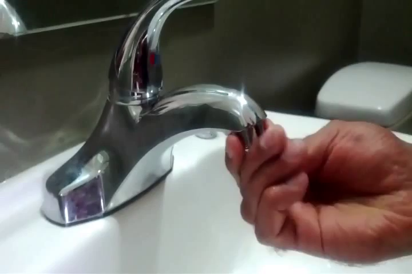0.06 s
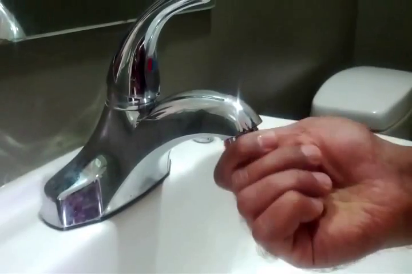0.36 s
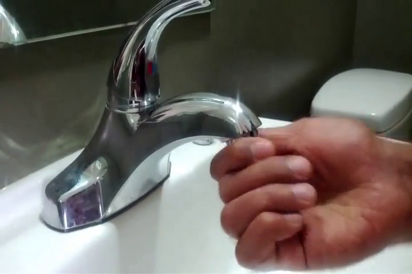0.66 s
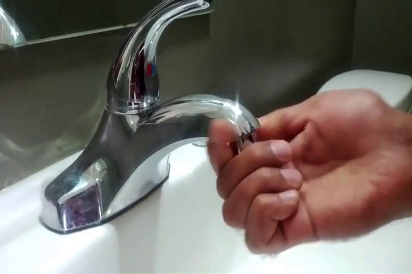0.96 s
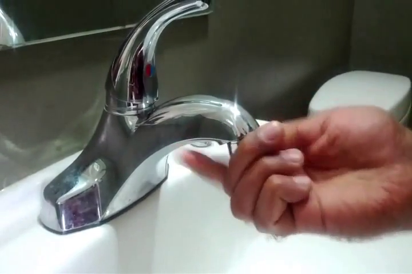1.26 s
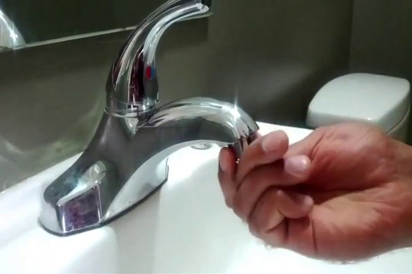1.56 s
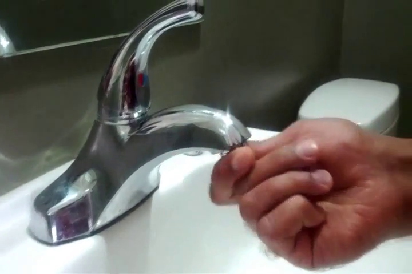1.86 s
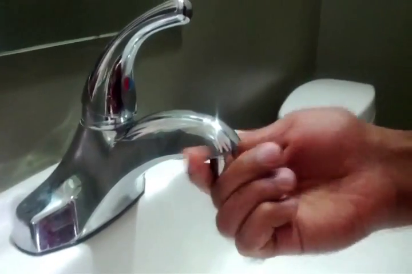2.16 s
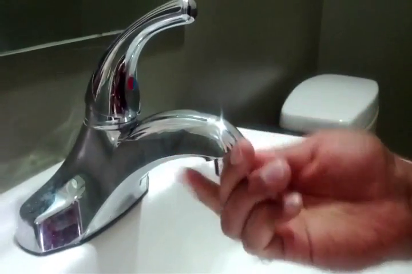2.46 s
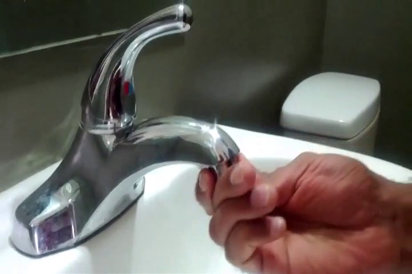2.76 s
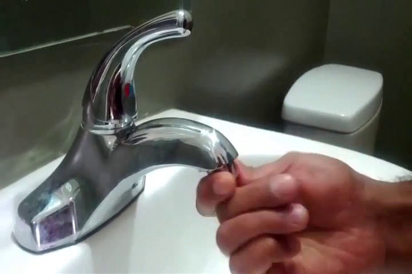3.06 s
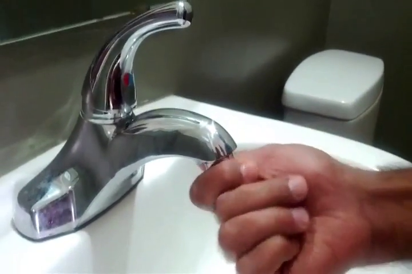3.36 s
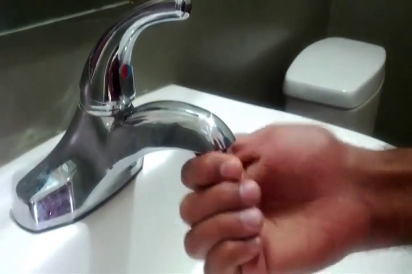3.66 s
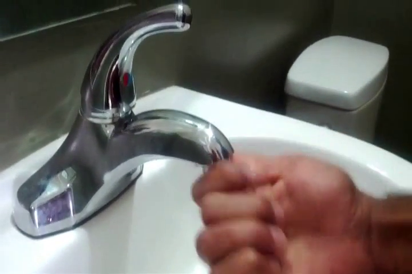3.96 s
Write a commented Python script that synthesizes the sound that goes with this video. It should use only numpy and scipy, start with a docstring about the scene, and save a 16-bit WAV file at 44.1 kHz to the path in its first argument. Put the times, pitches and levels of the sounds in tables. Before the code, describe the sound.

Close, uneven clicks and brief scrapes come from the threads of a faucet tip being unscrewed, with soft finger brushes between turns. Near the end comes one bright snap and a lighter knock, over a faint hum in a small bathroom.

```python
"""Gritty scrapes and clicks, over a faint hum, as a hand twists the aerator on a bathroom faucet.
The threads of this small fitting catch and slip, and each slip rings the spout and basin.
Fingers pop off the fitting and brush the chrome between turns. Near the end it jumps free
with a sharp snap, rubs faintly and knocks once. It is all close by, in a small hard room."""
import sys
import numpy as np
from scipy import signal
from scipy.fft import rfft, irfft, next_fast_len
from scipy.io import wavfile

SR = 44100
rng = np.random.default_rng(int(sys.argv[2]) if len(sys.argv) > 2 else 0)


def wav_out(sig):
    """Save sig, one row per channel (or a flat mono array), as 16-bit PCM at SR to the path in sys.argv[1]."""
    wavfile.write(sys.argv[1], SR, np.round(np.clip(np.atleast_2d(sig).T, -1, 1) * 32767).astype(np.int16))


N = 176400
CLOCK = np.arange(N) / SR  # seconds through the whole scene
SIZE = 32768  # samples in one short sound
T = np.arange(SIZE) / SR
HZ = np.fft.rfftfreq(SIZE, 1 / SR)
LEAD_S = .02  # time left before a slip for its creak


def amp(db):
    """Turn decibels into a gain."""
    return 10 ** (np.asarray(db) / 20)


def along(points, hz):
    """Read a curve of (pitch_hz, value) points on a log pitch scale."""
    pitches, values = np.transpose(points)
    return np.interp(np.log(hz + 1), np.log(pitches + 1), values)


def normed(x):
    """Scale to an energy of one."""
    return x / np.sqrt(np.sum(x ** 2) + 1e-20)


def add(track, start_s, sound):
    """Mix a sound into the track."""
    part = track[max(0, round(start_s * SR)):][:len(sound)]
    part += sound[:len(part)]


def causal(db):
    """A filter with these gains that never rings before it is struck (minimum phase)."""
    cepstrum = irfft(np.log(amp(db)))
    cepstrum[1:SIZE // 2] *= 2
    cepstrum[SIZE // 2 + 1:] = 0
    return np.exp(rfft(cepstrum))


def evened(x):
    """Level out a sound's spectrum, using wider bands for higher pitches."""
    spectrum = rfft(x)
    half_hz = np.clip(.15 * HZ, 10, 800) / 2
    total = np.cumsum(np.abs(spectrum) ** 2)
    power = (np.interp(HZ + half_hz, HZ, total) - np.interp(HZ - half_hz, HZ, total)) / half_hz
    return normed(irfft(spectrum * causal(-10 * np.log10(np.abs(power) + 1e-12))))


def noise(tone):
    """Steady noise with the given tone and an average power of one."""
    gain = amp(along(tone, np.fft.rfftfreq(N, 1 / SR)))
    return normed(irfft(rfft(rng.standard_normal(N)) * gain, N)) * np.sqrt(N)


# tone of the room's air: pitch_hz, gain_db
AIR_TONE = [(12, -22), (20, 5.5), (65, -10), (141, -4.5), (496, -12.5), (733, -13.5), (1080, -18.5),
            (1740, -19), (1950, -24), (2300, -26.5), (3310, -29.5), (5780, -29.5), (6840, -31),
            (11300, -27), (15800, -23)]
def background(air_db=-54.5, hum_hz=47.3, hum_db=-57.5):
    """Soft room air and a low hum run all the way through."""
    hum = np.sqrt(2) * np.sin(2 * np.pi * hum_hz * CLOCK)
    return amp(air_db) * noise(AIR_TONE) + amp(hum_db) * hum


# scrapes of the thread: start_s, length_s, then one drive_db for each of the five grip bands
SCRAPES = [(0.075, 0.058, -46, -56, -50, -50.5, -47.0), (0.155, 0.045, -42, -44, -38, -38, -33.5),
           (0.284, 0.028, -47, -54, -43, -42, -39), (0.365, 0.079, -49, -54, -41.5, -50, -48),
           (0.398, 0.037, -34, -47, -41, -45, -39), (1.585, 0.045, -42.5, -50, -46, -44, -45.5),
           (1.797, 0.013, -34.5, -40, -44, -34, -37), (1.885, 0.03, -65, -54, -45, -44, -50),
           (1.906, 0.015, -43.5, -44, -41, -41, -37), (1.932, 0.0074, -35.5, -34.5, -30.5, -28, -27),
           (2.801, 0.086, -51, -60, -53, -51, -53), (2.996, 0.015, -43.5, -41, -47, -38.5, -44.5),
           (3.02, 0.024, -39.5, -43, -35, -35.5, -41.5), (3.084, 0.059, -67, -54, -45.5, -48.5, -47)]
def scrapes():
    """Longer turns grind along the thread and ring the spout."""
    out = np.zeros(N)
    for start_s, length_s, *drive_db in SCRAPES:
        add(out, start_s, strike(grind(length_s), grip(drive_db) * faucet()))
    return out


def grind(length_s, slips_per_s=240, jitter=.75, spread_db=5, decay_s=.0006, hiss=.2):
    """The force of a turning thread: it sticks and slips unevenly over a fine hiss."""
    stroke = np.abs(np.sin(np.pi * T / length_s)) ** .47 * (T < length_s)
    gaps, sizes = rng.uniform(-1, 1, (2, round(slips_per_s * SIZE / SR)))
    starts = np.cumsum(1 + jitter * gaps) - 1 + jitter
    slips = np.bincount((starts * SR / slips_per_s).astype(int), amp(spread_db * sizes), SIZE)[:SIZE]
    crackle = signal.lfilter([1], [1, -np.exp(-1 / (decay_s * SR))], slips)
    return stroke * (crackle + hiss) * rng.standard_normal(SIZE)


# the five grip bands, low to high: pitch_hz
GRIP_BANDS = [400, 1100, 2200, 6000, 12500]
def grip(drive_db):
    """The grip sets how hard each band of pitches is driven."""
    return causal(along(list(zip(GRIP_BANDS, drive_db)), HZ))


# overall tone of the faucet: pitch_hz, gain_db
FAUCET_TONE = [(40, -24), (130, -11.5), (260, -12), (600, 0.5), (1100, 0.5), (1600, 1), (2200, -2.5),
               (2900, -8), (3600, -12), (5200, -14.5), (7500, -10.5), (9000, -22), (11600, -18),
               (14000, -7.5), (15800, -16.5)]
# notes at which the spout and basin ring: pitch_hz, width_hz, boost_db
FAUCET_RINGS = [(283.5, 26, 12), (346.5, 5.4, 18.5), (506.7, 8.5, 16.5), (1018, 31, 6), (1176, 59, 4.5),
                (2050, 190, 6.5), (2690, 113, 6), (4540, 210, 1.5), (6220, 130, 6), (7050, 180, 5),
                (7870, 190, 9.5), (10450, 320, 17), (10800, 120, 14.5), (12200, 140, 11.5), (13200, 300, 8),
                (13770, 320, 6.5)]
def faucet(basin_below_hz=600, scatter_db=3.5, max_detune=.015):
    """Each grip shifts the pitch and strength of the spout's notes; the basin's stay put."""
    hz, width_hz, boost_db = np.transpose(FAUCET_RINGS)
    spout = hz > basin_below_hz
    scatter = scatter_db * np.clip(rng.standard_normal(len(hz)), -1, 1)
    detune = max_detune * rng.uniform(-1, 1, len(hz))
    return resonant(FAUCET_TONE, zip(hz * (1 + detune * spout), width_hz, boost_db + scatter * spout))


def resonant(tone, rings):
    """A metal part acts as a filter: ringing notes on top of an overall tone."""
    peaks = sum((amp(db) ** 2 - 1) / (1 + (2 * (HZ - hz) / width) ** 2) for hz, width, db in rings)
    gain_db = along(tone, HZ) + 10 * np.log10(np.maximum(1 + peaks, .1))
    return rfft(normed(irfft(causal(gain_db))))


def strike(force, part):
    """A force, its spectrum levelled out, rings a part and then the room."""
    return irfft(rfft(evened(force)) * part * room()) * np.sqrt(.03 * SR)


# time the bathroom's echo takes to fall by 60 dB: pitch_hz, fade_s
ECHO_FADE = [(120, 0.56), (500, 0.23), (1400, 0.25), (2200, 0.19), (4000, 0.2), (9000, 0.13), (15000, 0.13)]
# tone of that echo: pitch_hz, gain_db
ECHO_TONE = [(150, 14.5), (500, 3), (2000, -0.5), (6000, -1), (13000, -4.5)]
def room(wall_delay_s=.0016, rise_s=.0017, late_fade_s=1, late_db=-20):
    """The direct sound plus a fresh echo off the hard walls, with a faint longer tail."""
    hz, t, bands = signal.stft(rng.standard_normal(SIZE), SR, nperseg=256)
    fade_s = along(ECHO_FADE, hz)[:, None]
    early = amp(-60 * t / fade_s) / np.sqrt(fade_s)
    late = amp(late_db - 60 * t / late_fade_s) / np.sqrt(late_fade_s)
    echo = signal.istft(bands * (early + late), SR, nperseg=256)[1][:SIZE]
    echo = evened(echo * np.clip((T - wall_delay_s) / rise_s, 0, 1))
    return 1 + rfft(echo) * causal(along(ECHO_TONE, HZ))


# clicks of the thread: start_s, rise_s, then one drive_db for each of the five grip bands
CLICKS = [(0.14, 0.0019, -41, -35.5, -35.5, -36, -44.5), (0.336, 0.001, -41, -41, -45.5, -40, -46),
          (0.454, 0.00075, -44.5, -50, -61, -55, -57), (0.5511, 0.0017, -44, -49.5, -55.5, -60, -62),
          (0.78, 0.0015, -45, -40.0, -43.5, -43, -46.5), (0.8828, 0.0012, -69, -46.5, -42, -41, -46),
          (0.8871, 0.00091, -47.5, -47, -39.5, -51, -61), (1.125, 0.0026, -60, -55.5, -58, -55.5, -60),
          (1.2107, 0.0011, -41, -41.5, -45.5, -42, -41), (1.257, 0.0016, -62, -55, -52, -76, -61),
          (1.389, 0.0037, -48, -48, -52.5, -48, -48), (1.407, 0.0027, -46, -48, -54, -62.0, -55),
          (1.439, 0.0014, -52, -46.5, -43, -45.5, -55), (1.4995, 0.0043, -45.5, -45.5, -46, -48, -50.5),
          (1.6206, 0.0024, -41, -46, -46.5, -53, -47.5), (1.804, 0.0035, -41, -49, -35, -42.5, -35),
          (1.820, 0.0013, -37, -37, -37.5, -37.5, -70), (1.929, 0.0012, -54, -42.5, -34.5, -48, -34),
          (2.0993, 0.0023, -48, -61, -58.5, -64, -63), (2.1431, 0.0022, -52, -59.5, -52, -60, -65),
          (2.1575, 0.0015, -45, -44.5, -47.5, -52.5, -48.5), (2.473, 0.0017, -41, -60, -44.5, -45, -54.5),
          (2.5208, 0.0026, -34.5, -45.5, -35, -41, -37.5), (2.637, 0.0016, -47.5, -38.5, -48, -47, -48.5),
          (2.686, 0.002, -74, -55, -38, -44.5, -49), (3.012, 0.0019, -44, -47, -45, -45, -46),
          (3.029, 0.0021, -45, -51, -48, -49, -50)]
def clicks(boost_db=2.5, creak_s=.0032, creak_db=-17):
    """The thread creaks briefly, then slips in a tight cluster of tiny impacts."""
    out = np.zeros(N)
    creak = amp(creak_db) * np.exp(-np.abs(T - LEAD_S) / creak_s)
    for start_s, rise_s, *drive_db in CLICKS:
        force = (creak + slip(rise_s)) * rng.standard_normal(SIZE)
        add(out, start_s - LEAD_S, strike(force, grip(drive_db) * faucet()))
    return amp(boost_db) * out


def slip(rise_s):
    """The strength of one slip: it waits LEAD_S, climbs to a peak and dies away."""
    age = np.maximum(T - LEAD_S, 0) / rise_s
    return age ** 2 * np.exp(2 - 2 * age)


# pops and pings as the grip lets go: start_s, pitch_hz, level_db, fade_s (to fall by 60 dB)
POPS = [(.141, 3250, -24, 0.008), (.7815, 3260, -31, 0.01), (1.2111, 2330, -18.5, .01),
        (1.2113, 727, -22.5, 0.012), (1.501, 2280, -31, 0.026), (1.621, 2003, -36, 0.12),
        (1.806, 2010, -28.5, 0.075), (1.804, 10540, -27, 0.031), (1.937, 6200, -24, 0.022),
        (2.473, 1176, -15, 0.012), (2.4925, 1190, -19.5, 0.01), (2.524, 2080, -27.5, 0.042),
        (2.6366, 1160, -19.5, 0.021), (2.687, 2110, -32, .025)]
def pops(attack_s=.00063, echo_db=-1):
    """A pocket of air or the loose fitting rings for a moment."""
    out = np.zeros(N)
    for start_s, pitch_hz, level_db, fade_s in POPS:
        loudness = amp(level_db - 60 * T / fade_s) * (1 - np.exp(-T / attack_s))
        ring = np.sin(2 * np.pi * pitch_hz * T) * loudness
        echo = amp(echo_db) * (room() - 1)
        add(out, start_s, irfft(rfft(ring) * (1 + echo)))
    return out


# rumbles of the moving hand: middle_s, half_length_s, level_db
RUMBLES = [(.26, 0.067, -46), (.55, 0.062, -53.5), (1.02, 0.049, -57), (1.87, 0.15, -46)]
# tone of the rumble: pitch_hz, gain_db
RUMBLE_TONE = [(10, -15), (22, 5), (31, -0.5), (45, -10), (90, -18), (300, -66), (1000, -120)]
# skin brushing the chrome: middle_s, half_length_s, level_db
BRUSHES = [(.425, 0.029, -49), (1.015, 0.036, -51.5), (1.33, 0.048, -49), (2.265, 0.027, -55),
           (2.48, 0.024, -53.5), (2.55, 0.033, -53.5), (3.765, 0.01, -48.5), (3.8, 0.032, -56.5)]
# tiny ticks of skin: middle_s, level_db
TICKS = [(0.67, -46), (2.216, -49), (3.837, -50), (3.863, -41), (3.753, -42)]
# tone of skin on chrome: pitch_hz, gain_db
SKIN_TONE = [(100, -53), (3000, -37), (7000, -12), (9500, -7.5), (11000, 1), (14000, 4), (16000, -2)]
def fingers(tick_s=.0011):
    """The moving hand rumbles; its skin hisses and ticks on the chrome."""
    ticks = sum(amp(db) * np.exp(-np.abs(CLOCK - middle_s) / tick_s) for middle_s, db in TICKS)
    skin = (swells(BRUSHES) + ticks) * noise(SKIN_TONE)
    return skin + swells(RUMBLES) * noise(RUMBLE_TONE)


def swells(rows):
    """Smooth, bell-shaped rises and falls in level."""
    return sum(amp(db) * np.exp(-.5 * ((CLOCK - middle_s) / half_s) ** 2) for middle_s, half_s, db in rows)


# the fitting snaps free: start_s, rise_s, level_db
SNAP = (3.1313, 0.0012, -20.5)
# overall tone of the freed fitting: pitch_hz, gain_db
FITTING_TONE = [(40, -42), (130, -13), (300, -8), (520, -4), (850, -1.5), (1350, -7.5), (2000, -3.5),
                (2800, -1.5), (3600, -10.5), (5000, -7.5), (7400, -4), (9000, -10.5), (11600, -10),
                (14000, -0.5), (15800, -9)]
# notes at which it rings: pitch_hz, width_hz, boost_db
FITTING_RINGS = [(342.4, 5.7, 13.5), (509, 11.5, 16.5), (2030, 90, 9), (2620, 97, 8), (2760, 160, 6),
                 (4490, 450, 8.5), (5500, 82, 5.5), (7040, 140, 9.5), (7580, 110, 11.5), (10700, 460, 8.5),
                 (12400, 380, 6), (13860, 190, 7)]
# it rubs on the thread: start_s, length_s, level_db
RUB = (3.325, 0.082, -46)
# it knocks against its seat: start_s, rise_s, level_db
KNOCK = (3.5199, 0.00083, -34)
# overall tone of the knock: pitch_hz, gain_db
KNOCK_TONE = [(100, -20), (500, -11), (1600, -2), (2900, -9), (9500, -14), (14000, -10), (15800, -17)]
# notes of the short tube inside the fitting: pitch_hz, width_hz, boost_db
TUBE_RINGS = [(1950, 210, 12.5), (3880, 140, 12.5), (5600, 130, -4), (7400, 300, 11)]
def snap_free():
    """The fitting jumps free and rings by itself, bright and hard; then it rubs faintly and knocks."""
    out = np.zeros(N)
    fitting = resonant(FITTING_TONE, FITTING_RINGS)
    tube = resonant(KNOCK_TONE, TUBE_RINGS)
    for (start_s, rise_s, level_db), part in (SNAP, fitting), (KNOCK, tube):
        force = slip(rise_s) * rng.standard_normal(SIZE)
        add(out, start_s - LEAD_S, amp(level_db) * strike(force, part))
    start_s, length_s, level_db = RUB
    add(out, start_s, amp(level_db) * strike(grind(length_s), fitting))
    return out


def scene():
    """All the sounds meet at one microphone."""
    return (clicks() + snap_free() + scrapes() + pops() + fingers() + background())[None]


def record(dry, top_hz=15850, edge_hz=300):
    """The recorder cuts off the very highest treble."""
    size = next_fast_len(N + SIZE)
    hz = np.fft.rfftfreq(size, 1 / SR)
    kept = np.clip((top_hz - hz) / edge_hz + .5, 0, 1)
    return irfft(rfft(dry, size) * kept, size)[:, :N]


dry = scene()
out = record(dry)
wav_out(out)
```